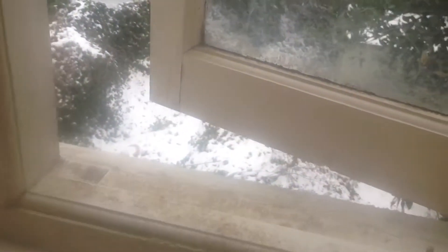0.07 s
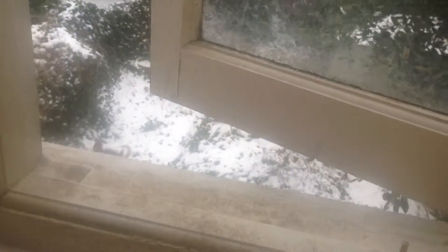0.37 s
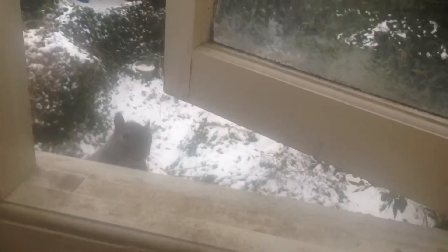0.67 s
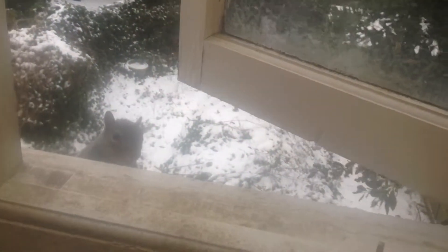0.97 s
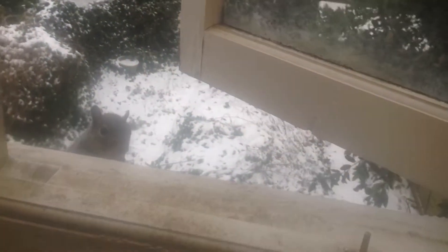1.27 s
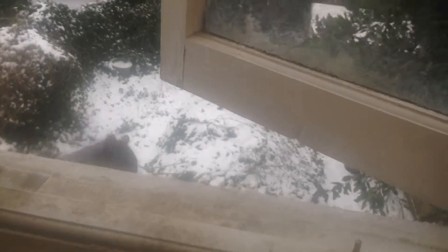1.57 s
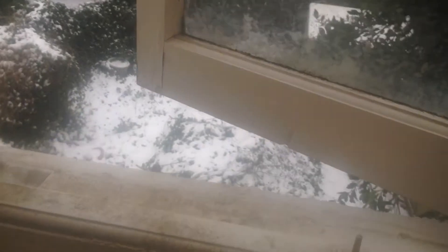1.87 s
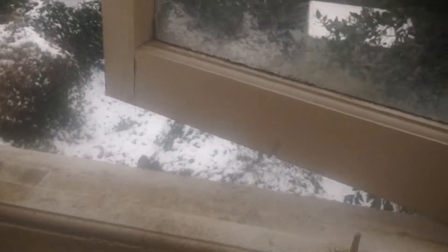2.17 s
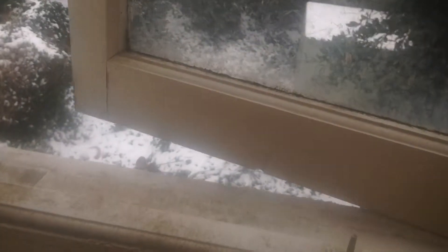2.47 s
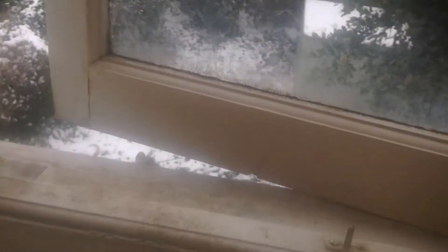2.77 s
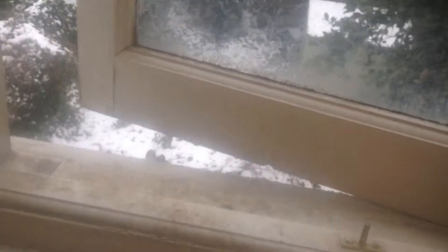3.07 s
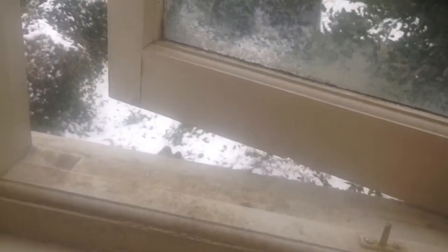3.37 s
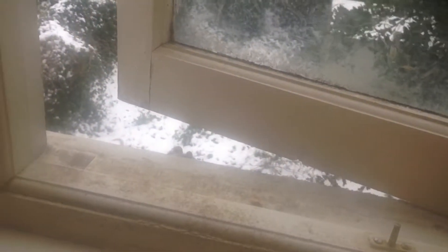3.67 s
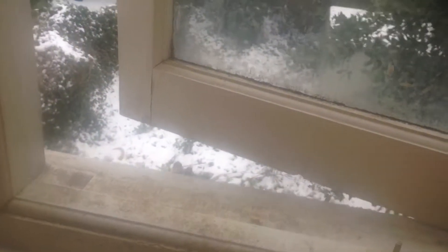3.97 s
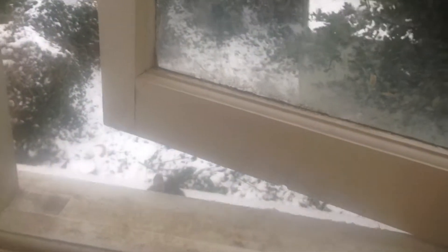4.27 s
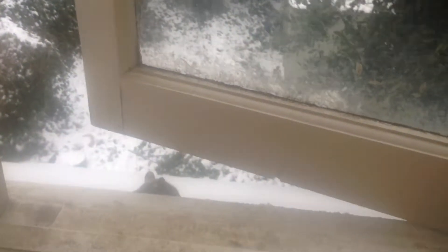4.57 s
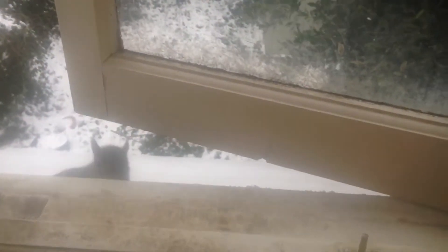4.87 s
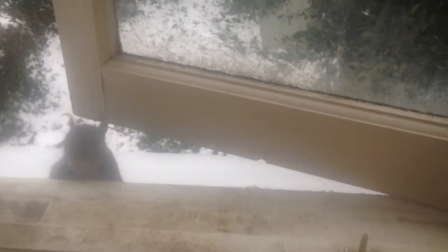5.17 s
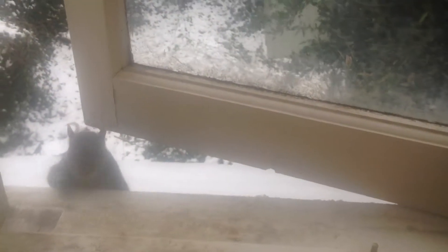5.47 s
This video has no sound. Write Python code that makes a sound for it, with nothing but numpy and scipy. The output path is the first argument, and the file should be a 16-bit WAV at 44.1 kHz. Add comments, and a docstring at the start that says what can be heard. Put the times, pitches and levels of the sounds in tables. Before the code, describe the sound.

Two close, sharp knocks and a later thud from a wooden window, with light taps and faint rustles over low rumble and hiss.

```python
"""Soft knocks and faint rustles, close by: a wooden casement window is pulled nearly shut.
Its metal fitting clacks, then the sash knocks on the frame; each blow rings the modes of sash, pane
and woodwork. Pushes make the sash drag; stick-slip makes it judder, creak and groan on its hinges.
Behind it, quiet hiss and the rumble of a small room above a snowy garden."""
import sys
import numpy as np
from scipy import signal
from scipy.fft import rfft, irfft
from scipy.io import wavfile
from scipy.ndimage import uniform_filter1d

SR = 44100
rng = np.random.default_rng(int(sys.argv[2]) if len(sys.argv) > 2 else 0)


def file_out(sig):
    """Save sig as 16-bit WAV at sys.argv[1]."""
    # one column per channel
    cols = np.atleast_2d(sig).T
    # limit, then scale
    lim = np.clip(cols, -1, 1)
    pcm = np.round(lim * 32767).astype(np.int16)
    wavfile.write(sys.argv[1], SR, pcm)


N = 252252
TIME_S = np.arange(N) / SR
RING_S = np.arange(SR // 2) / SR  # time since a blow

# blows on the sash (time [s], thump [dB], clack [dB], clack centre [Hz], tick [dB])
SASH_KNOCKS = [(0.098, -43.5, -52.5, 258, -71), (0.131, -45, -53.5, 333, -60),
               (0.218, -44, -49.5, 324, -66), (0.819, -60, -59, 3160, -42.5), (0.997, -54, -40, 676, -53),
               (2.036, -49, -48.5, 1450, -43.5), (2.6517, -23.5, -25, 520, -21),
               (2.674, -38, -37, 1400, -36.5), (2.9705, -25.5, -16, 1170, -32),
               (2.978, -47, -21, 2100, -60), (3.000, -32.5, -35, 850, -50), (3.018, -42, -40, 1670, -58),
               (3.044, -40, -40, 990, -60), (3.192, -45.5, -42.5, 1250, -58),
               (3.2127, -63, -43.5, 1600, -47.5), (4.094, -41.5, -46.5, 800, -45),
               (4.118, -47, -44, 800, -44), (4.3235, -24.5, -36, 445, -53), (4.329, -39, -43, 1310, -55)]
# hinge slips (time [s], level [dB])
HINGE_SLIPS = [(1.307, -43), (2.191, -34.5), (2.324, -30.5), (2.418, -31.5)]
# pushes on the sash (time [s], hold [s], shuffle [dB], scuff [dB])
SASH_PUSHES = [(0.941, 0.15, -53.5, -68), (2.16, 0.38, -50.5, -68.5), (2.836, 0.37, -50, -67),
               (4.052, 0.37, -54.5, -69)]
# modes of sash and pane (frequency [Hz], level [dB], t60 [s])
SASH_MODES = [(76.5, -4.5, 1), (120, -11, 0.3), (153.7, 0.5, 0.28), (167, -8.5, 0.2), (217.1, -4, 0.41),
              (262, -10, 0.072), (294.2, 0.5, 0.43), (374.5, -8.5, 0.2), (423, -7.5, 0.33),
              (451.8, -2.5, 0.17), (517, -18, 0.29), (646, -5.5, 0.22), (683, -4, 0.14), (822, -6, 0.16),
              (912, -2.5, 0.12), (960, -12, 0.17), (1071, 2.5, 0.043), (1123, -7, 0.074), (1195, -14, 0.08),
              (1250, -11, 0.11), (1330, -10, 0.086), (1684, -13, 0.12), (1874, -14.5, 0.13),
              (2093, -7, 0.075), (2278, -0.5, 0.034), (2300, -3.5, 0.06), (2407, -6.5, 0.06)]
# dense woodwork modes (frequency [Hz], spectral density [dB], t60 [s])
WOOD_BANDS = [(50, 5, 0.74), (98, -16, 0.5), (170, -2.5, 0.24), (393, -2, 0.25), (610, -3.5, 0.17),
              (950, -1.5, 0.14), (1420, -8.5, 0.13), (2320, -12.5, 0.1), (3240, -7, 0.061),
              (5760, -1, 0.012), (14920, -44, .05)]
# crack of hard contact (frequency [Hz], spectral density [dB], t60 [s])
CRACK_BANDS = [(500, 6, 0.17), (1500, -8.5, 0.22), (2970, -8, 0.14), (4900, -0.5, 0.068), (6350, -6, 0.07),
               (7650, -8.5, 0.078), (10000, -14, 0.066), (12810, -20, 0.056), (15600, -26.5, .04)]
# modes of the metal fitting (frequency [Hz], level [dB], t60 [s])
FITTING_MODES = [(4940, -15.5, 0.05), (7870, 4, 0.0065), (9120, -13.5, 0.062), (9600, -16, 0.035),
                 (10630, -14.5, 0.025), (11400, -15, 0.03)]
# rubbing sash (time [s], length [s], pitch [Hz], peak [dB])
SASH_GROANS = [(1.975, 0.0085, 1130, -52.5), (2.878, 0.019, 140, -37.5), (3.103, 0.049, 139, -33),
               (3.153, 0.02, 127, -34.5), (3.224, 0.018, 303, -36), (4.258, 0.05, 276, -36)]
# rustles and small scrapes (time [s], decay [s], level [dB], centre [Hz], half-width [octaves])
RUSTLE_EVENTS = [(0.303, 0.013, -59, 4870, 0.83), (0.345, 0.017, -63.5, 5500, 0.98),
                 (0.442, 0.037, -61, 5060, 1), (0.497, 0.05, -61, 4200, 0.51),
                 (0.562, 0.037, -55.5, 4350, 0.69), (1.19, 0.021, -61.5, 2040, 0.41),
                 (1.225, 0.079, -69.5, 2900, 0.48), (1.656, 0.018, -63, 3700, 0.46),
                 (2.194, 0.053, -60.5, 4440, 0.49), (2.845, 0.016, -57, 890, 0.22),
                 (3.415, 0.014, -61, 4970, .6), (4.062, 0.037, -55.5, 4440, .6),
                 (4.371, 0.008, -58, 3180, 0.21), (4.61, 0.04, -66, 870, 0.18),
                 (4.738, 0.018, -65, 4440, .4), (4.81, 0.011, -54.5, 4600, 0.33)]
# room rumble and hiss (frequency [Hz], spectral density [dB])
ROOM_SPECTRUM = [(20, -39), (35, -13.5), (55, 1.5), (95, -4.5), (145, 6.5), (200, 1.5), (290, 0.5),
                 (400, -13), (700, -13.5), (1500, -20.5), (3000, -27), (8000, -24.5), (15000, -26)]
# airy hiss envelope (time [s], level [dB])
AIR_LEVELS = [(0, -68.5), (1.8, -67.5), (2.2, -64.5), (4.2, -63.5), (4.7, -67), (5.3, -69), (5.7, -63.5)]
# airy hiss colour (frequency [Hz], spectral density [dB])
AIR_SPECTRUM = [(300, 6), (1000, -3.5), (2000, -0.5), (4500, 1), (6000, -2.5), (8000, -8.5), (14000, -17)]


def window(sash_db=-4, wood_db=17, crack_db=-1, ring_db=3, dense_db=-3, radiate_hz=128, point_count=7):
    """One sash: drag, blows at several contact points, the fitting's clink, groans."""
    sash = amp(sash_db) * modes(SASH_MODES)
    points = [(amp(wood_db) * dense_modes(WOOD_BANDS), amp(crack_db) * dense_modes(CRACK_BANDS))
              for _ in range(point_count)]
    bending = sash.sum(axis=0)
    out = drag(bending)
    for k, (time_s, *contact) in enumerate(list(SASH_KNOCKS) + judders()):
        wood, crack = points[k % point_count]
        signs = rng.choice([-1., 1.], len(SASH_MODES))  # hard contact: own polarity per mode
        struck = amp(ring_db) * signs @ sash + amp(dense_db) * wood
        add(out, time_s, blow(bending + wood, struck, crack, *contact))
    out = cut(out, radiate_hz, "high", order=4)  # air slips round the narrow sash: little deep bass
    add(out, time_s=2.6518, x=clink())
    for time_s, *rub in SASH_GROANS:
        add(out, time_s, groan(*rub))
    return out


def blow(pushed, struck, crack, thump_db, clack_db, clack_hz, tick_db,
         firm_hz=366, db_per_octave=16, edge_ratio=1.204, snap_db=-1, snap_s=0.0029):
    """Slow push drives low modes, hard contact middle ones, first touch snaps. Softer is duller."""
    softness_db = max(thump_db - max(clack_db, tick_db), 0)
    thump = cut(pushed, firm_hz / 2 ** (softness_db / db_per_octave), "low", order=2)
    clack = cut(struck, clack_hz / edge_ratio, "high", order=2)
    clack = cut(clack, clack_hz * edge_ratio, "low", order=2)
    tick = crack * (1 + amp(snap_db) * np.exp(-RING_S / snap_s))
    return amp(thump_db) * thump + amp(clack_db) * clack + amp(tick_db) * tick


def clink(gain_db=-18.5):
    """The metal fitting, knocked home, rings briefly."""
    return amp(gain_db) * modes(FITTING_MODES).sum(axis=0)


def judders(rebound_s=0.029, rebound_db=-4, clack_rel_db=-25.5, clack_hz=950, tick_rel_db=-43):
    """Hinges stick and let go: a soft blow and a weaker rebound. Rows as in SASH_KNOCKS."""
    rebounds = [(time_s + rebound_s, db + rebound_db) for time_s, db in HINGE_SLIPS]
    return [(time_s, db, db + clack_rel_db, clack_hz, db + tick_rel_db)
            for time_s, db in list(HINGE_SLIPS) + rebounds]


def groan(length_s, pitch_hz, peak_db, jitter=0.041, overtone_db=-33):
    """A few uneven stick-slip cycles swell and die."""
    count = int(length_s * SR)
    waver = uniform_filter1d(rng.standard_normal(count), int(SR / pitch_hz))
    phase = 2 * np.pi * np.cumsum(pitch_hz * (1 + jitter * waver / waver.std())) / SR
    swell = np.sin(np.linspace(0, np.pi, count))
    return amp(peak_db) * swell * (np.sin(phase) + amp(overtone_db) * np.sin(2 * phase))


def drag(response, top_hz=297, patchy_db=6, attack_s=0.029, release_s=0.1):
    """Friction during each push: low sash modes shuffle, wood scuffs in patches."""
    shuffle = signal.fftconvolve(rng.standard_normal(N), response)[:N]
    shuffle = cut(shuffle, top_hz, "low", order=2)
    scuff = brush(N, centre_hz=926, octaves=0.89) * amp(patchy_db * wander(count=250))
    out = 0
    for time_s, hold_s, shuffle_db, scuff_db in SASH_PUSHES:
        attack = np.clip(1 + (TIME_S - time_s) / attack_s, 0, 1)
        release = np.exp(-np.maximum(TIME_S - time_s - hold_s, 0) / release_s)
        friction = amp(shuffle_db) * shuffle / shuffle.std() + amp(scuff_db) * scuff
        out = out + attack * release * friction
    return out


def creak(start_s=1.31, gap_s=0.0195, decay_s=0.0065, level_db=-61, centre_hz=1150, octaves=0.22):
    """Five quick, faint hinge slips. Rows as in RUSTLE_EVENTS."""
    return [(start_s + k * gap_s, decay_s, level_db, centre_hz, octaves) for k in range(5)]


def rustles(events):
    """Short brushes: instant onset, Gaussian decay."""
    out = np.zeros(N)
    for time_s, decay_s, level_db, centre_hz, octaves in events:
        grains = brush(len(RING_S), centre_hz, octaves)
        add(out, time_s, amp(level_db) * grains * np.exp(-(RING_S / decay_s) ** 2))
    return out


def reverb(x, wet_db=-23, t60_s=0.49, damp_hz=3500, build_s=0.0126):
    """Small room: short, dull tail."""
    tail = rng.standard_normal(len(RING_S)) * fade(t60_s) * (1 - np.exp(-RING_S / build_s))
    tail = cut(tail / np.linalg.norm(tail), damp_hz, "low", order=1)
    return amp(wet_db) * signal.fftconvolve(x, tail)[:N]


def background(room_db=-59, waver_db=1.58, rumble_top_hz=1200):
    """Wavering room rumble, even hiss, slowly swelling airy hiss."""
    room = amp(room_db) * coloured_noise(ROOM_SPECTRUM)
    rumble = signal.sosfiltfilt(signal.butter(2, rumble_top_hz, fs=SR, output="sos"), room)
    waver = amp(waver_db * wander(count=60))
    air_db = np.interp(TIME_S, *np.transpose(AIR_LEVELS))
    air = amp(air_db) * coloured_noise(AIR_SPECTRUM)
    return room + rumble * (waver - 1) + air


def modes(table):
    """Damped sines from rest, one row each."""
    return np.array([amp(db) * np.sin(2 * np.pi * hz * RING_S) * fade(t60_s) for hz, db, t60_s in table])


def dense_modes(table):
    """Unresolved modes: third-octave noise bands, each with its own decay."""
    spectrum = rfft(rng.standard_normal(len(RING_S)))
    out = 0
    for hz in 50 * 2 ** (np.arange(26) / 3):
        in_band = np.abs(np.log2((bins_hz(RING_S) + 1) / hz)) < 1 / 6
        band = irfft(spectrum * in_band, len(RING_S))
        rise = np.minimum(RING_S * hz, 1)  # one cycle to build up
        out = out + amp(lookup(hz, table)) * band * rise * fade(lookup(hz, table, column=2))
    return out


def brush(count, centre_hz, octaves, grains_per_s=3000, spread_db=3.5):
    """Tiny uneven clicks in one band, rms 1."""
    clicks = (rng.random(count) < grains_per_s / SR) * rng.choice([-1, 1], count)
    clicks = clicks * amp(spread_db * rng.standard_normal(count))
    detune = np.log2((bins_hz(clicks) + 1) / centre_hz) / octaves
    grains = irfft(rfft(clicks) / (1 + detune ** 2), count)
    return grains / grains.std()


def coloured_noise(table):
    """Noise with a tabulated spectrum, rms 1."""
    white = rng.standard_normal(N)
    noise = irfft(rfft(white) * amp(lookup(bins_hz(white), table)), N)
    return noise / noise.std()


def wander(count):
    """Evenly spaced random values joined by lines."""
    return np.interp(TIME_S, np.linspace(0, TIME_S[-1], count), rng.standard_normal(count))


def fade(t60_s):
    """Free decay after a blow."""
    return np.exp(-np.log(1000) * RING_S / t60_s)


def cut(x, hz, kind, order):
    """Butterworth low-pass or high-pass."""
    return signal.sosfilt(signal.butter(order, min(hz, SR / 3), kind, fs=SR, output="sos"), x)


def lookup(hz, table, column=1):
    """Table column, interpolated over log frequency."""
    columns = np.transpose(table)
    return np.interp(np.log(np.maximum(hz, 1)), np.log(columns[0]), columns[column])


def bins_hz(x):
    """FFT bin frequencies of x."""
    return np.arange(len(x) // 2 + 1) * SR / len(x)


def amp(db):
    """Decibels to gain."""
    return 10 ** (np.asarray(db) / 20)


def add(out, time_s, x):
    """Mix x in at time_s."""
    start = int(time_s * SR)
    out[start:start + len(x)] += x[:len(out) - start]


def scene():
    """Window and rustles in the room, over the background. Mono."""
    near = window() + rustles(RUSTLE_EVENTS) + rustles(creak())
    return (near + reverb(near) + background())[None]


def record(dry):
    """Steep low-pass on the top treble."""
    top_hz = 15400
    return signal.sosfilt(signal.ellip(10, .2, 70, top_hz, fs=SR, output="sos"), dry)


dry = scene()
out = record(dry)
file_out(out)
```